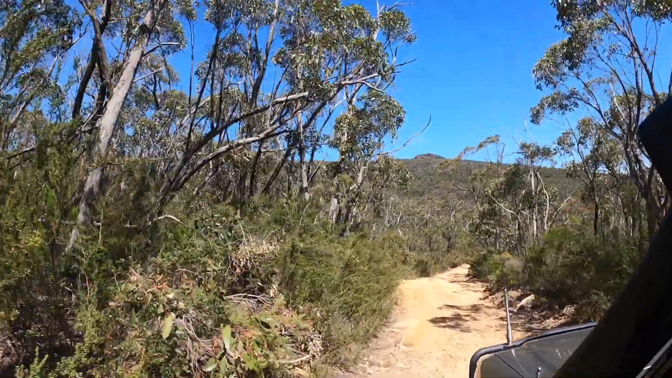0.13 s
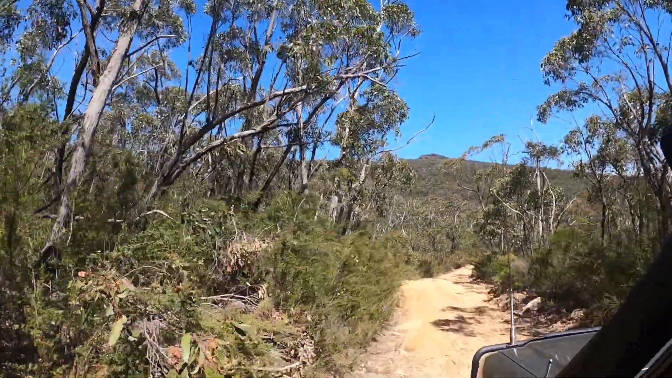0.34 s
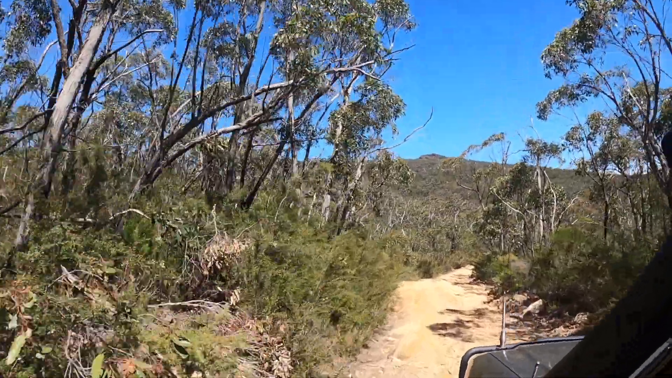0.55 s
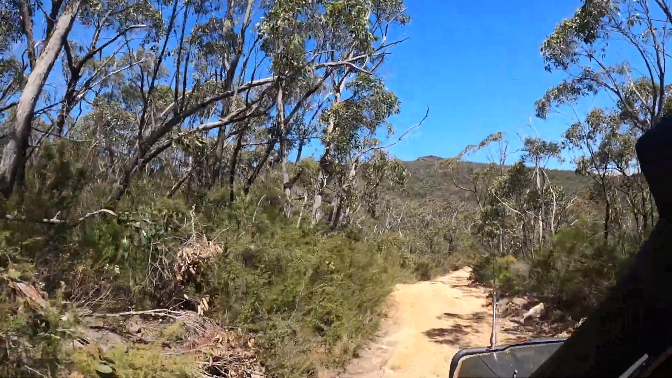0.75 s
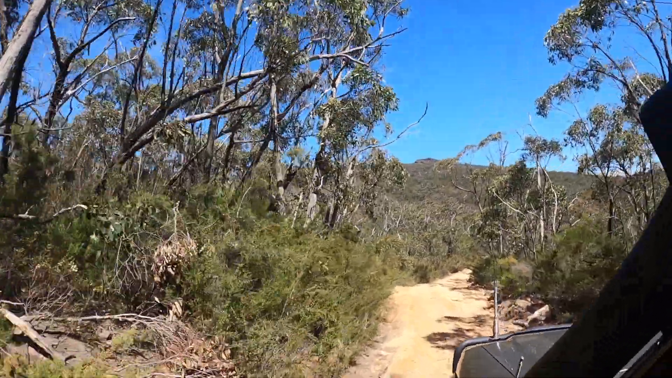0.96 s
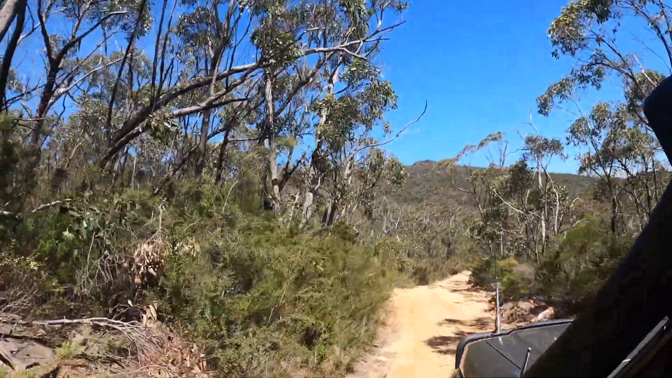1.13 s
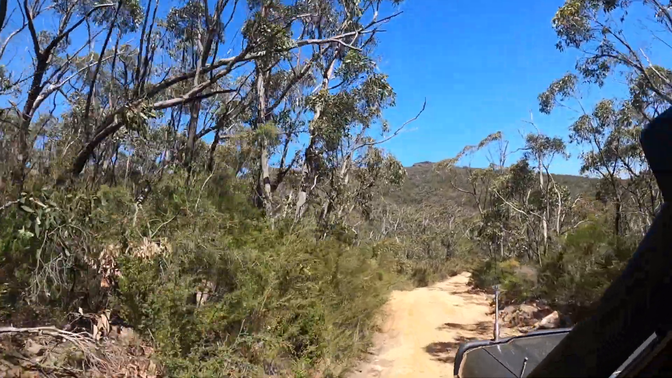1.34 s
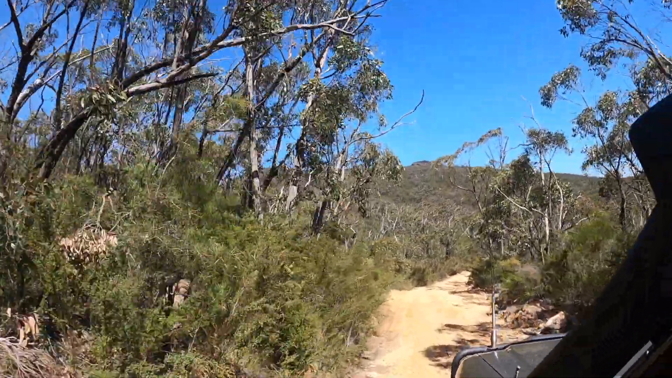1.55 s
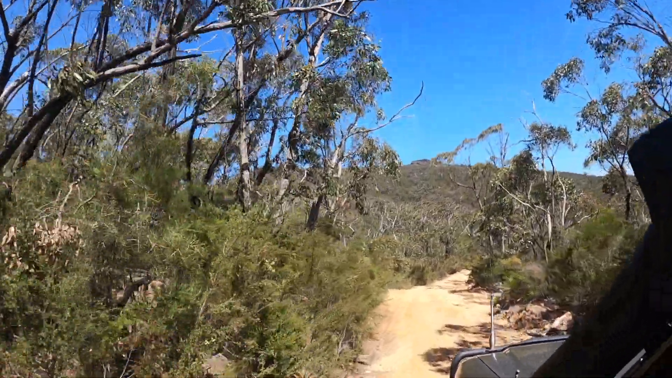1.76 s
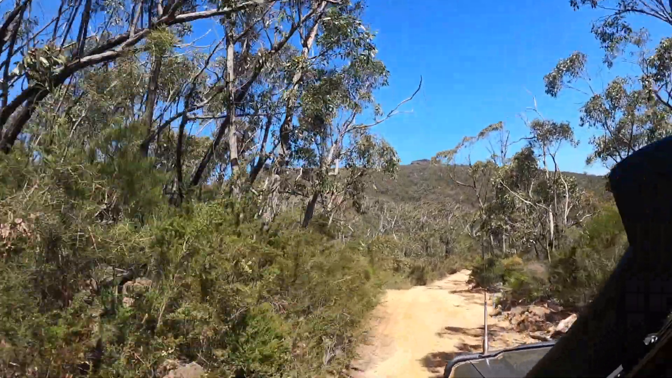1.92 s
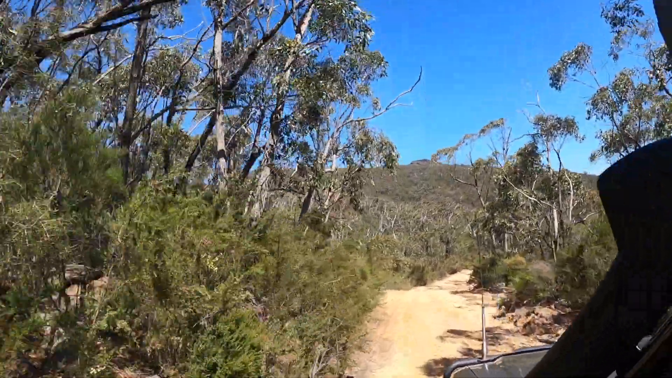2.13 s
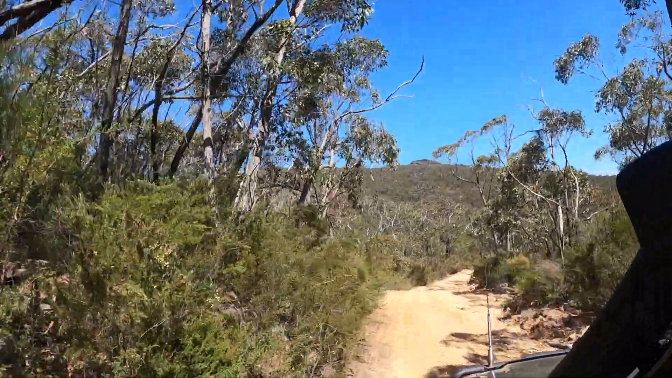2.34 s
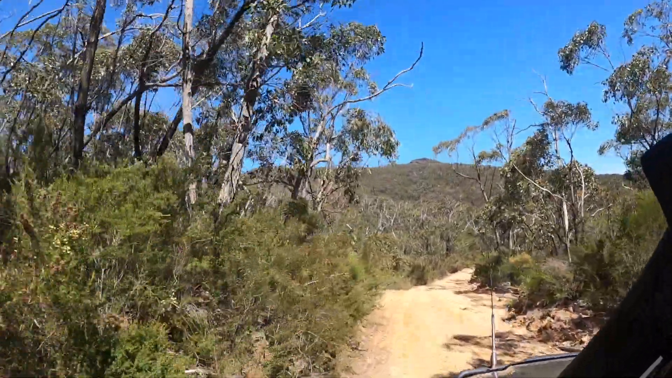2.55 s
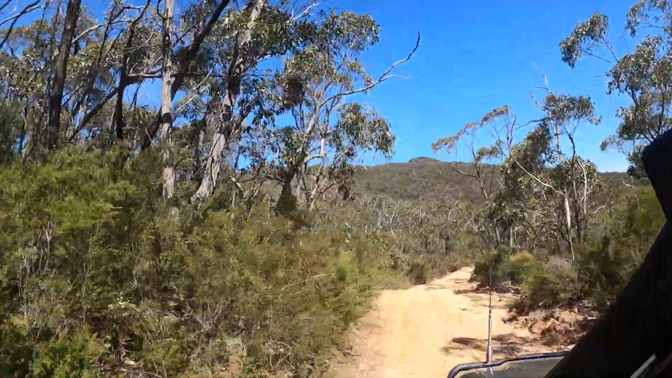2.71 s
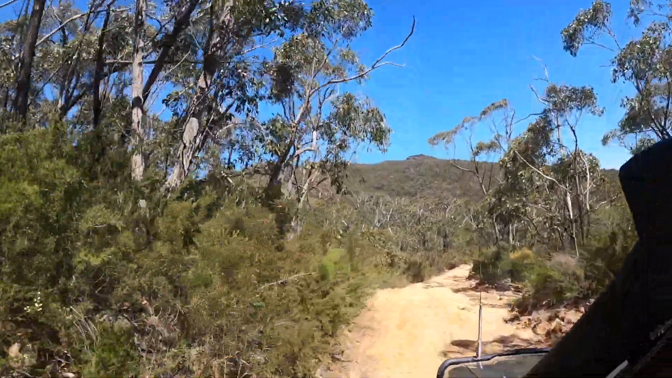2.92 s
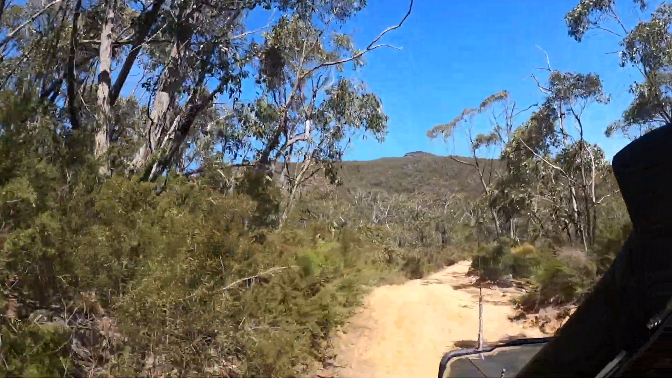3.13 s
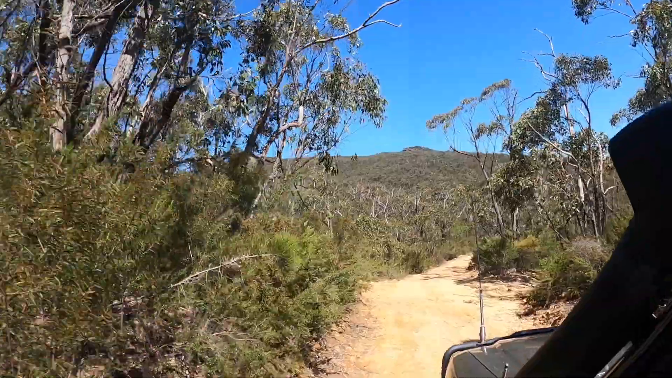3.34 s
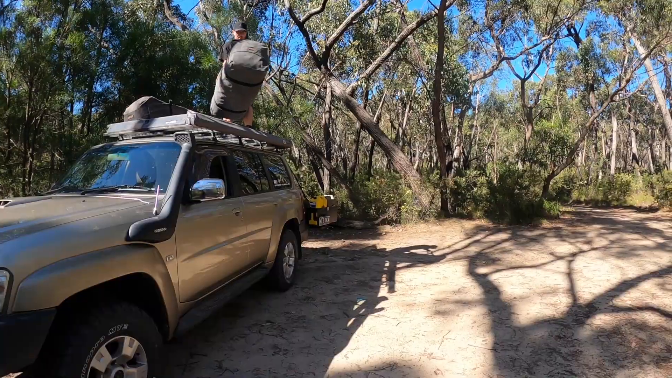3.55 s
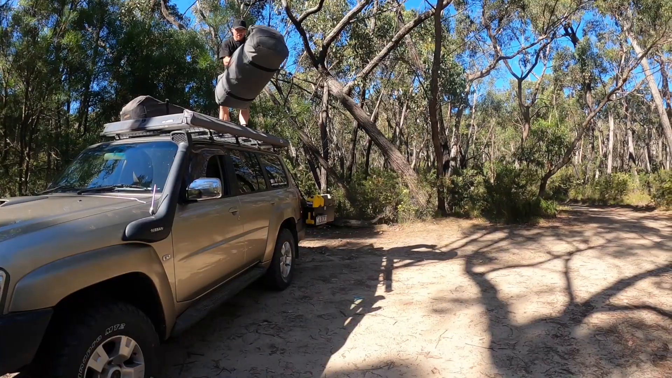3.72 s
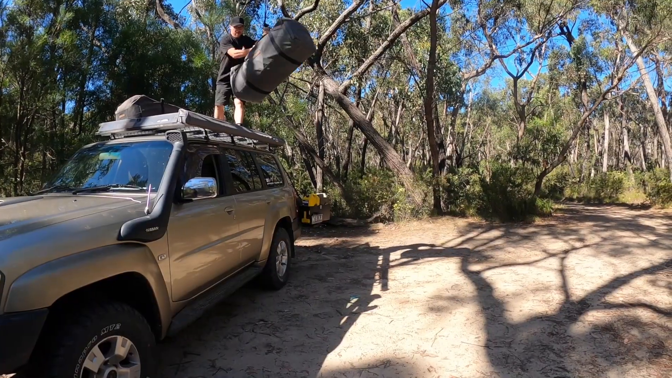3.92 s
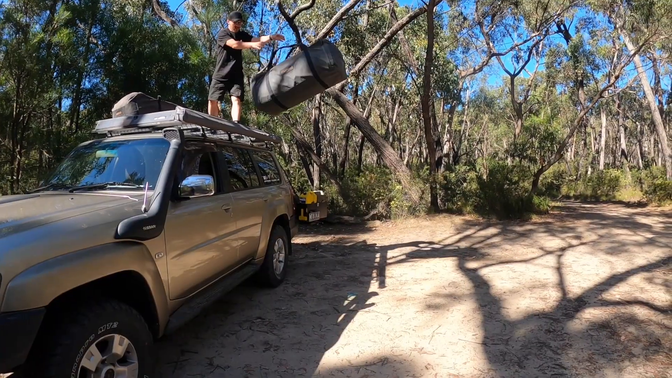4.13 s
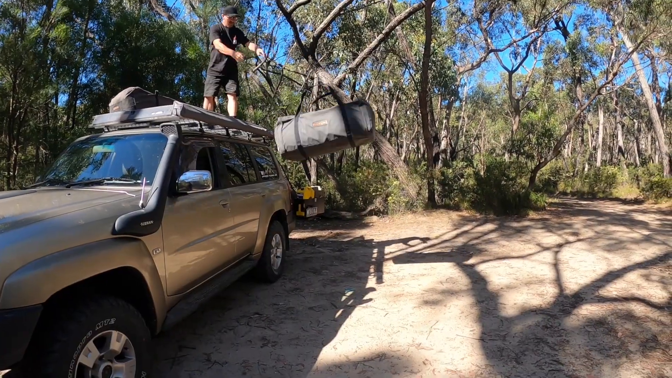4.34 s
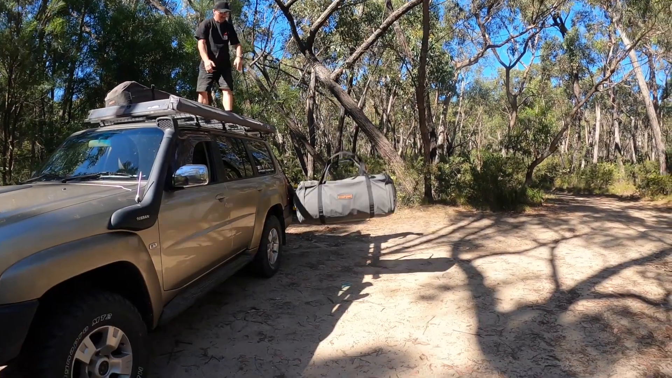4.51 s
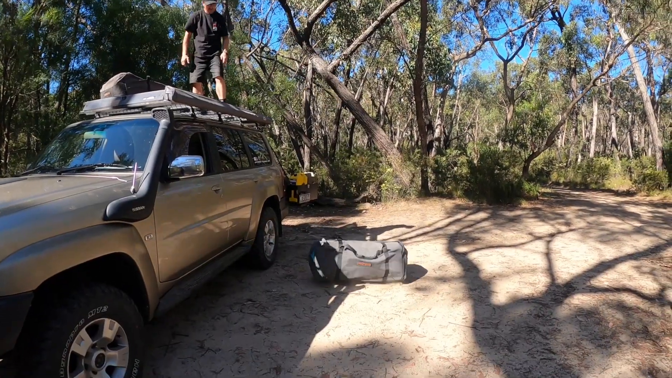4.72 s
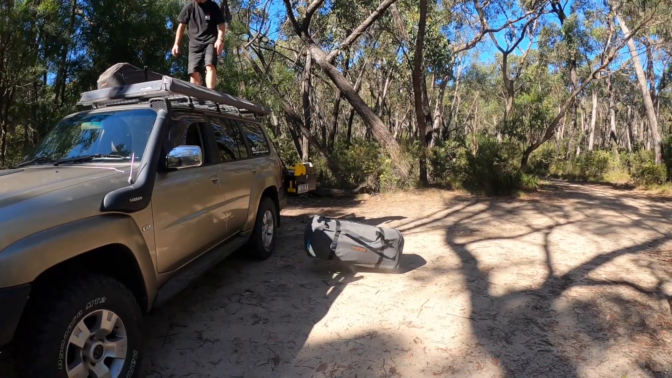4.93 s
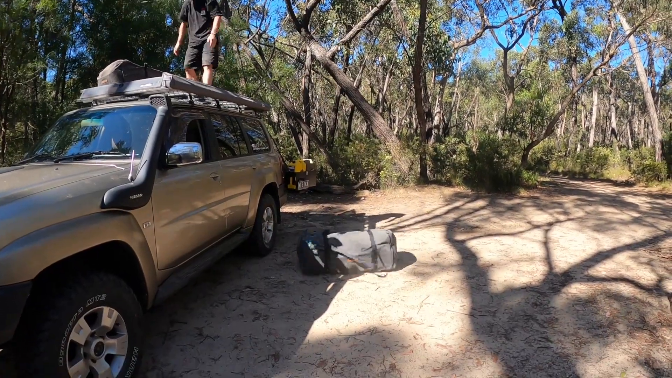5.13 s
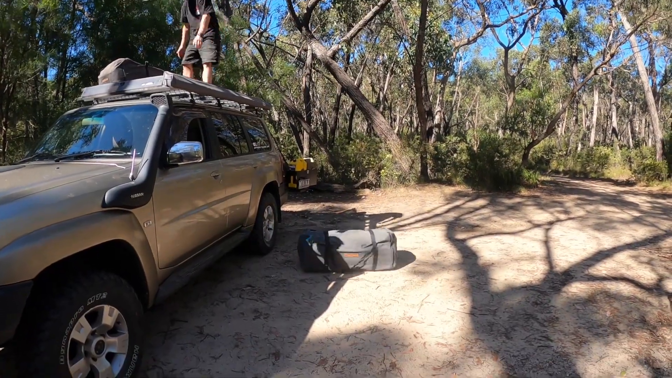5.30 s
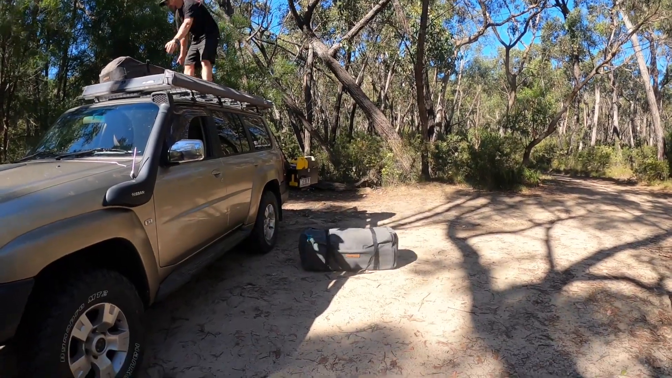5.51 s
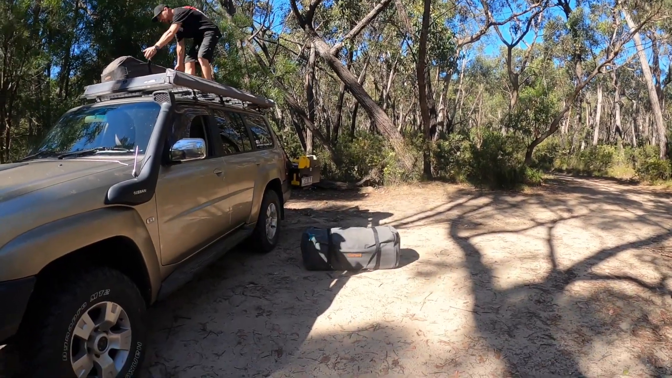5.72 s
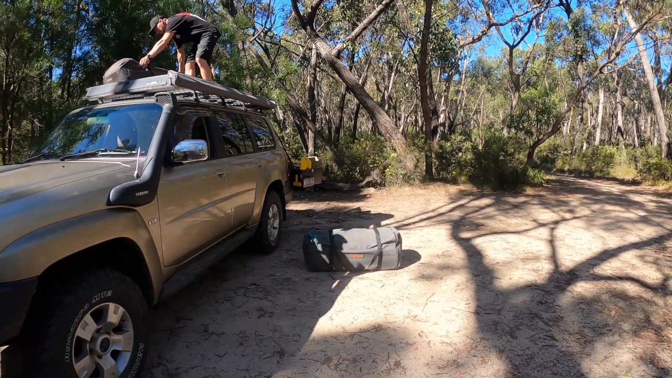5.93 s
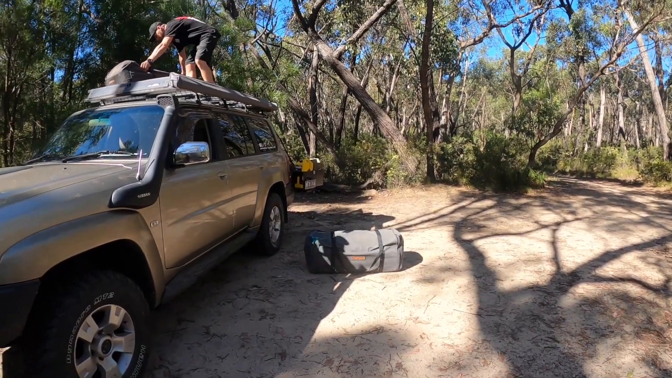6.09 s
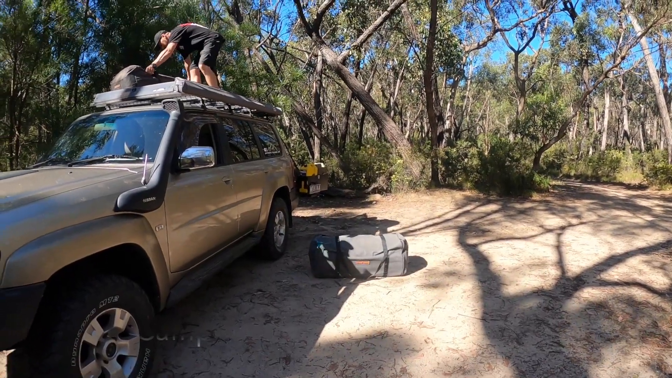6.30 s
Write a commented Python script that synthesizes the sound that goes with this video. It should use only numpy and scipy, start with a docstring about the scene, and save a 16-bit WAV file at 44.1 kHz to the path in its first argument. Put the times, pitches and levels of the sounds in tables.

```python
"""Dirt track drive, then a thrown canvas bag

A four-wheel drive at an open window, in mono: shaped noise for buffeting air, drumming and crushed gravel,
sagging noise bursts for jolts, flicked stones and wind, a wandering sine for a squeaking fitting. Then a
quiet bush clearing in stereo: a rolled canvas bag thrown from the roof rack thuds, scuffs and bounces on dirt
(rung modes, grit and drag noise, slow sines) over leaves, murmur and wind noise; far birds are gliding sines.
"""
import sys
import numpy as np
from scipy import signal
from scipy.fft import rfft, irfft, next_fast_len
from scipy.io import wavfile

SR = 44100
rng = np.random.default_rng(int(sys.argv[2]) if len(sys.argv) > 2 else 0)


def rack_gain(trim_db):
    """Turn a fader trim in dB into the linear factor to multiply a signal by."""
    fader = np.asarray(trim_db, float)
    return 10 ** (fader / 20)


def log_audio(samples):
    """Write samples as a 16-bit WAV file to the path given in sys.argv[1]."""
    # one column per channel
    frames = np.atleast_2d(samples).T
    # limit to full scale, then quantise
    limited = np.clip(frames, -1, 1)
    pcm = np.round(limited * 32767).astype(np.int16)
    wavfile.write(sys.argv[1], SR, pcm)


N = 284886

FADE_END_S, FADE_S = 3.468, 0.016

# Noise spectra, relative: hz, density_db_per_hz
BUFFET_SPECTRUM = [(20, -9.5), (35, 3.5), (70, 0), (110, -3.5), (170, -16), (300, -48), (900, -110)]
DRUMMING_SPECTRUM = [(60, -7.5), (110, -1), (200, 0.5), (300, -8.5), (480, -9.5), (700, -27), (1200, -45),
                     (4000, -110)]
GRAVEL_SPECTRUM = [(250, -37), (450, 0.5), (750, -4), (1200, -6.5), (2000, -13.5), (3200, -21.5),
                   (5000, -32), (8300, -44), (13000, -62.5), (16000, -96.5)]
LEAVES_SPECTRUM = [(250, -19), (500, -0.5), (800, -7), (1200, -1.5), (2000, -5), (4000, -7), (5000, -10.5),
                   (8200, -18.5), (10000, -34), (16000, -58)]
MURMUR_SPECTRUM = [(70, -41), (130, -4), (220, -0.5), (330, -4), (500, -13), (800, -42), (3000, -78)]
PORT_WIND_SPECTRUM = [(20, -17.5), (40, 0), (65, -7.5), (100, -24.5), (200, -29), (800, -100)]
CANVAS_SPECTRUM = [(40, 2.5), (160, 4.5), (380, -1), (700, -11.5), (1100, -11.5), (2200, -26), (6000, -44),
                   (10000, -76.5)]
GRIT_SPECTRUM = [(300, -13.5), (2000, -4), (4000, -11.5), (8000, -29), (16000, -62.5)]
# Left-right likeness of stereo noise: hz, likeness (0 to 1)
LIKENESS = [(60, 0.27), (250, 1), (1000, 0.75), (2600, 0.38)]

# Track roughness as drumming of the body: time_s, level_db
TRACK_ROUGHNESS = [(0, -31.5), (0.252, -26.5), (0.621, -24), (0.95, -23), (1.249, -33.5), (1.6, -26),
                   (1.751, -31.5), (2.051, -21.5), (2.2, -31), (2.4, -23), (2.601, -28.5), (2.8, -25),
                   (3.0, -23), (3.35, -16), (3.45, -24)]
BUFFET_DB, BUFFET_FOLLOWS = -21, 0.31  # at mean roughness after the lull; share of its dB swing
LULL_DB, LULL_MID_S, LULL_RISE_S = -9, 0.41, 0.1  # air starts weak, then sets in
CABIN_TOP = 0.61  # soft overload height
# Cabin drone, climbing as the vehicle gathers speed: time_s, pitch_hz
DRONE_PITCH = [(0, 190), (2.1, 200), (3.0, 261.7)]
DRONE_DB, DRONE_WIDTH_HZ = -7.5, 14.2  # dB relative to drumming
# Loose gravel under the tyres, used relative to its mean: time_s, level_db
LOOSENESS = [(0, -46.5), (.28, -49), (.55, -45), (.85, -49), (1.08, -44), (1.42, -46), (2.05, -44.5),
             (2.25, -45.5), (2.8, -44), (3.2, -45.5), (3.44, -46)]
GRAVEL_DB, GRAVEL_FOLLOWS = -34, 0.99  # at mean looseness; share of its dB swing
SPRAY_DB, SPRAY_FOLLOWS, SPRAY_HZ = -16, 0.44, 2780  # relative to gravel; extra share; highpass
# Squeaks of a loose fitting: start_s
SQUEAK_STARTS = [.215, .38, .505, .62, .845, 0.904, 1.579, 1.65, 1.69, 1.72, 2.41, 2.505, 2.57, 2.835,
                 3.089, 3.245, 3.285, 3.41]
SQUEAK_HZ, SQUEAK_WANDER_HZ, SQUEAK_S, SQUEAK_DB = 5815, 60, .03, -57  # length is 1/e width
# Jolts, flicked stones and wind bursts of falling pitch; the first row is a faint high squeak,
# drawn here as a noise burst: start_s, peak_db, starting_pitch_hz
SAGGING_BURSTS = [(0.11, -44.5, 6900), (.705, -16.5, 217), (0.83, -15, 152), (1.092, -18.5, 1110),
                  (1.357, -20.5, 432), (1.424, -16.5, 1000), (1.431, -11.5, 281), (1.433, -26, 1510),
                  (1.443, -12.5, 533), (2.03, -12, 145), (2.003, -30.5, 4100), (2.117, -21.5, 890),
                  (2.459, -24.5, 2570), (2.787, -21.5, 746), (2.98, -11.5, 340), (3.125, -20, 1030),
                  (3.268, -21.5, 890), (3.333, -21.5, 665)]
SAG_S, SAG_TO = .025, .3  # time constant; final share of starting pitch

# Background level of leaves and murmur, before panning; falls after the thud, then recovers:
# time_s, level_db
BACKGROUND = [(3.5, -53.5), (4.2, -57), (4.501, -55.5), (5.099, -65), (5.88, -61.5), (5.98, -58.5),
              (6.201, -60), (6.46, -56.5)]
MURMUR_DB, MURMUR_FOLLOWS, MURMUR_LAG_S = -58, 0.97, 0.13  # at mean background; share of dB swing; lag
# Wind puffs on the microphone ports, before panning: peak_s, half_width_s (to 1/e), level_db
PUFFS = [(4.5, 0.093, -44), (5.49, 0.1, -54.5), (6.219, 0.1, -51)]
CALM_DB = -67  # port noise between puffs, before panning
# Far birds, before roughening and panning: start_s, length_s, start_hz, end_hz, peak_db
CHIRPS = [(4.26, .26, 6800, 7500, -71), (4.375, .07, 5150, 5700, -68), (4.63, .03, 3500, 4100, -59),
          (4.65, .025, 4700, 5200, -62), (5.465, .04, 4400, 3200, -65), (5.46, .14, 5750, 5900, -76),
          (6.03, .13, 6700, 6700, -72)]
TRILL_START_S, TRILL_GAP_S, TRILL_NOTES = 5.385, .0625, 6
# Slow swings of roof and ground: start_s, length_s, pitch_hz, peak_db
BOOMS = [(4.355, 0.17, 36.2, -33), (4.746, 0.025, 36.3, -13.5)]
# Drags: canvas at the lift and around the contacts with dirt (some leading into them), # and a late shuffle of
# boots on the rack: start_s, level_db (before the attack), fall_db_per_s
SCUFFS = [(3.53, -47.5, 54), (4.679, -17.5, 179), (4.775, -42.5, 135), (4.81, -34, 108), (5.048, -37, 246),
          (5.159, -32, 207), (5.29, -47.5, 103), (5.41, -51.5, 201), (5.915, -49, 124)]
SCUFF_ATTACK_DB = 3.5  # attack time constant, as the time of this much fall
# Touches of bag and boots, drive into each part: time_s, body_db, slap_db, grit_db
TOUCHES = [(3.807, -62, -54, -46), (4.351, -44.5, -57, -48), (4.702, -16.5, -31, -39.5),
           (4.712, -3.5, -15, -14.5), (4.7149, -5, -3.5, -38), (4.737, -19, -38, -41.5),
           (4.765, -39, -43, -42), (5.052, -50, -57, -45), (5.153, -55, -58, -38.5),
           (5.1672, -31.5, -34, -32.5), (5.177, -25.5, -35, -31.5), (5.19, -39, -47, -50),
           (5.202, -36, -57, -43.5), (5.227, -46, -57, -50), (5.303, -47, -63, -45),
           (5.315, -44, -46, -43.5), (5.324, -59, -58.5, -46.5), (5.445, -72, -70, -53),
           (5.493, -62, -56, -49.5), (5.935, -67, -53.5, -52), (5.966, -62, -48, -46),
           (6.319, -68, -72, -43.5)]
# Packed body modes, before the lowpass: pitch_hz, relative_db, t60_s
BODY_MODES = [(147, 8, 0.042), (197.6, 3, 0.048), (355, 0.5, 0.027), (620, -9, 0.011)]
# Tight canvas modes, before the lowpass: pitch_hz, relative_db, t60_s
SLAP_MODES = [(1135, 5.5, 0.014), (1880, -2, 0.0056)]
LEFT_LAG_S = .00005  # bag lands right of centre
# Returns from car side and trunks: delay_s, left_db, right_db
ECHOES = [(.007, -14, -25), (0.02, -28, -25)]


def rms_one(x):
    """Scale to an rms of 1."""
    return x / np.sqrt(np.mean(x ** 2) + 1e-20)


def in_time(rows):
    """Table columns joined by straight lines, one value a sample."""
    time_s, *columns = np.transpose(rows)
    return [np.interp(np.arange(N) / SR, time_s, column) for column in columns]


def column_mean(rows):
    """Plain mean of a table's second column."""
    return np.mean(np.array(rows)[:, 1])


def at_hz(points, hz):
    """Read a spectrum on a log-frequency axis."""
    point_hz, value = np.array(points).T
    return np.interp(np.log(hz), np.log(point_hz), value)


def drift(corner_hz):
    """Slow chance of rms 1: noise through a double pole, at a 40th of the sample rate."""
    r = np.exp(-80 * np.pi * corner_hz / SR)
    noise = rng.standard_normal(N // 40 + 2002)
    slow = rms_one(signal.lfilter([1], [1, -2 * r, r * r], noise)[2000:])
    return np.interp(np.arange(N) / 40, np.arange(len(slow)), slow)


def filtered(x, order, hz, kind="low"):
    """Butterworth filter."""
    return signal.sosfilt(signal.butter(order, hz, kind, fs=SR, output="sos"), x)


def pan(left_db):
    """Opposite dB gains on left and right."""
    return rack_gain([[left_db], [-left_db]])


def coloured(spectrum, lumps_db, lumps_hz, grit_db=0., wide=True):
    """Two-channel noise of rms 1: spread sample sizes make grit, slow drift makes lumps."""
    size = next_fast_len(N)
    hz = np.maximum(np.arange(size // 2 + 1) * SR / size, 1)
    grains = rack_gain(grit_db * np.minimum(rng.exponential(1, N), 5))
    white = rng.standard_normal((2, N)) * grains * rack_gain(lumps_db * drift(lumps_hz))
    mid, side = rfft(white, size) * rack_gain(at_hz(spectrum, hz)) * (hz > 15)
    alike = 1 - wide * (1 - np.clip(at_hz(LIKENESS, hz), 0, 1))
    both = np.sqrt(1 + alike) * mid + np.sqrt(1 - alike) * side * [[1], [-1]]
    return rms_one(irfft(both, size)[:, :N])


def ring(clicks, hz, t60_s):
    """Two-pole resonator: a unit click starts a decaying sine of height 1."""
    r = np.exp(-np.log(1000) / (t60_s * SR))
    w = 2 * np.pi * hz / SR
    return signal.lfilter([0, np.sin(w)], [1, -2 * r * np.cos(w), r * r], clicks + 1e-18)


def ring_modes(clicks, modes):
    """Sum of ringing modes with alternating sign."""
    return sum(rack_gain(db) * ring(clicks, hz, t60_s) * (-1) ** k for k, (hz, db, t60_s) in enumerate(modes))


def swells(rows):
    """Gliding sines under half-sine envelopes: start_s, length_s, start_hz, end_hz, peak_db."""
    out = np.zeros(N)
    for start_s, length_s, hz_from, hz_to, db in rows:
        u = np.linspace(0, 1, round(length_s * SR))
        turns = np.cumsum(hz_from + (hz_to - hz_from) * u) / SR
        out[round(start_s * SR):][:len(u)] += rack_gain(db) * np.sin(np.pi * u) * np.sin(2 * np.pi * turns)
    return out


def buffeting(roughness_db):
    """Low lumpy air noise that partly follows track roughness after an initial lull."""
    t = np.arange(N) / SR
    swing_db = roughness_db - column_mean(TRACK_ROUGHNESS)
    lull_db = LULL_DB * (1 - np.tanh((t - LULL_MID_S) / LULL_RISE_S)) / 2
    level = rack_gain(BUFFET_DB + BUFFET_FOLLOWS * swing_db + lull_db)
    return level * coloured(BUFFET_SPECTRUM, lumps_db=1.0, lumps_hz=13.0, wide=False)


def drone():
    """Narrow noise band: two slow drifts modulate quadrature carriers at the climbing pitch."""
    turns = 2 * np.pi * np.cumsum(in_time(DRONE_PITCH)[0]) / SR
    band = drift(DRONE_WIDTH_HZ) * np.cos(turns) + drift(DRONE_WIDTH_HZ) * np.sin(turns)
    return rack_gain(DRONE_DB) * band


def drumming(roughness_db):
    """Track roughness sets the level of lumpy body noise and the cabin drone."""
    body = coloured(DRUMMING_SPECTRUM, lumps_db=2.5, lumps_hz=13.7, wide=False)
    return rack_gain(roughness_db) * (body + drone())


def tyres():
    """Dense grain noise swells on loose patches, its highpassed spray most of all."""
    loose_db = in_time(LOOSENESS)[0] - column_mean(LOOSENESS)
    bed = coloured(GRAVEL_SPECTRUM, lumps_db=1.65, lumps_hz=25.7, grit_db=2.0, wide=False)
    spray = filtered(bed, 2, SPRAY_HZ, "high")
    spray_gain = rack_gain(SPRAY_DB + SPRAY_FOLLOWS * loose_db + 4.0 * drift(24.0))
    return rack_gain(GRAVEL_DB + GRAVEL_FOLLOWS * loose_db) * (bed + spray_gain * spray)


def squeaks():
    """Stick-slip as a sine of quickly wandering pitch, in short swells of uneven size."""
    t = np.arange(N) / SR
    hz = SQUEAK_HZ + SQUEAK_WANDER_HZ * drift(80)
    tone = np.sin(2 * np.pi * np.cumsum(hz) / SR)
    swell = sum(np.exp(-(2 * (t - start_s) / SQUEAK_S - 1) ** 2) for start_s in SQUEAK_STARTS)
    return rack_gain(SQUEAK_DB + drift(14)) * swell * tone


def sagging_bursts():
    """Bandpassed noise, read ever slower so pitch sags: a quick fall and a tail, longer when low."""
    out, t = np.zeros(N), np.arange(4000) / SR
    read_at = np.cumsum(SAG_TO + (1 - SAG_TO) * np.exp(-t / SAG_S))
    for start_s, db, hz in SAGGING_BURSTS:
        quick = np.exp(-t * hz / 4.)
        tail = 0.52 * np.exp(-t / (0.014 + 5. / hz))
        noise = rng.standard_normal(2 * len(t))
        steady = filtered(noise, 2, [hz / 1.34, min(hz * 1.26, 15000)], "band")[len(t):]
        sagging = np.interp(read_at, np.arange(len(t)), steady)
        burst = sagging * (1 - np.exp(-t / 0.0015)) * (quick + tail)
        out[round(start_s * SR):][:len(t)] += rack_gain(db) * burst / abs(burst).max()
    return out


def drive():
    """Air and drumming overload the microphone softly; tyres, bursts and squeaks add on top."""
    roughness_db = in_time(TRACK_ROUGHNESS)[0]
    cabin = buffeting(roughness_db) + drumming(roughness_db)
    return CABIN_TOP * np.tanh(cabin / CABIN_TOP) + tyres() + sagging_bursts() + squeaks()


def leaves(background_db):
    """Leaf rustle as wide noise at the background level, a little to the left."""
    return rack_gain(background_db) * coloured(LEAVES_SPECTRUM, lumps_db=-0.25, lumps_hz=9.7) * pan(.6)


def murmur(background_db):
    """Far low noise that follows the background level late."""
    t = np.arange(N) / SR
    swing_db = np.interp(t - MURMUR_LAG_S, t, background_db) - column_mean(BACKGROUND)
    level = rack_gain(MURMUR_DB + MURMUR_FOLLOWS * swing_db)
    return level * coloured(MURMUR_SPECTRUM, lumps_db=1.5, lumps_hz=14.0)


def port_wind():
    """Wind on the microphone ports: low noise with Gaussian puffs over a calm floor."""
    t = np.arange(N) / SR
    puffs = sum(rack_gain(db) * np.exp(-((t - peak_s) / width_s) ** 2) for peak_s, width_s, db in PUFFS)
    noise = coloured(PORT_WIND_SPECTRUM, lumps_db=1.5, lumps_hz=7.)
    return (rack_gain(CALM_DB) + puffs) * noise * pan(1.5)


def birds():
    """Chirps and a trill sinking and fading by note, left of centre, roughened by the trees."""
    trill = [(TRILL_START_S + TRILL_GAP_S * k, .034, 9400 - 140 * k, 8000 - 90 * k, -74 - .2 * k)
             for k in range(TRILL_NOTES)]
    return swells(CHIRPS + trill) * (1 + drift(200)) * pan(1.5)


def booms():
    """Roof and ground swing as deep sines of steady pitch."""
    return swells([(start_s, length_s, hz, hz, db) for start_s, length_s, hz, db in BOOMS])


def scuffs():
    """Dragging canvas and a late boot shuffle as gritty noise; slow drags also set in slowly."""
    t, drag = np.arange(N) / SR, np.zeros(N)
    for start_s, db, fall_db_per_s in SCUFFS:
        fallen_db = fall_db_per_s * np.maximum(t - start_s, 0)
        attack = (1 - np.exp(-fallen_db / SCUFF_ATTACK_DB)) ** 2
        drag += attack * rack_gain(db - fallen_db)
    return drag * coloured(CANVAS_SPECTRUM, lumps_db=2.5, lumps_hz=35.0, grit_db=2.5, wide=.3)


def left_late(x):
    """First-order lag between ports: left half late, right half early, by the slope."""
    return x - np.gradient(x) * LEFT_LAG_S * SR / 2 * np.array([[1], [-1]])


def thrown_grit(throws):
    """Each throw starts a puff of gritty noise with a quick fall and a faint longer tail."""
    t = np.arange(2600) / SR
    puff = (1 - np.exp(-t / 0.0024)) * (np.exp(-t / 0.004) + 0.09 * np.exp(-t / 0.029))
    noise = coloured(GRIT_SPECTRUM, lumps_db=2.0, lumps_hz=49.0, grit_db=1.5, wide=0.37)
    return np.convolve(throws, puff)[:N] * noise


def touches():
    """Pushes ring the packed body, slaps ring the tight canvas, grit is thrown."""
    pushes, slaps, throws = np.zeros((3, N))
    for time_s, *levels_db in TOUCHES:
        at = round(time_s * SR)
        pushes[at], slaps[at], throws[at] = rack_gain(np.array(levels_db))
    body = filtered(ring_modes(pushes, BODY_MODES), 3, 636.0)
    slap = filtered(ring_modes(slaps, SLAP_MODES), 3, 3050.0)
    return left_late(body) + left_late(slap) + thrown_grit(throws)


def echoes(x):
    """Dull bandpassed returns from car side and trunks, unlike in the two ears."""
    dull = filtered(x.mean(axis=0), 1, [200., 3000.], "band")
    return sum(rack_gain(np.array([[left_db], [right_db]])) * np.roll(dull, round(delay_s * SR))
               for delay_s, left_db, right_db in ECHOES)


def clearing():
    """Leaves, murmur and wind lie under the birds and the bag."""
    background_db = in_time(BACKGROUND)[0]
    bed = leaves(background_db) + murmur(background_db) + port_wind()
    hits = touches()
    return bed + birds() + booms() + scuffs() + hits + echoes(hits)


def scene():
    """The drive gives way to the clearing in a very short linear fade."""
    driving = np.clip((FADE_END_S - np.arange(N) / SR) / FADE_S, 0, 1)
    return driving * drive() + (1 - driving) * clearing()


def low_pass(x):
    """Removes everything above the highest recorded frequency."""
    return signal.sosfilt(signal.butter(12, 15500, fs=SR, output="sos"), x)


def record(dry):
    """Smooth saturation holds peaks under full scale."""
    held = dry / (1 + abs(dry / .97) ** 4) ** .25
    return low_pass(held)


dry = scene()
out = record(dry)
log_audio(out)
```